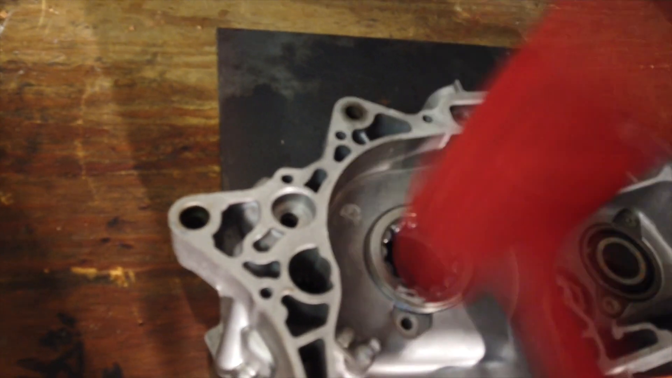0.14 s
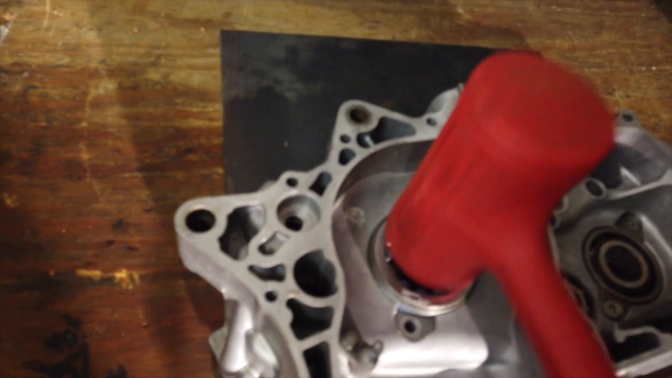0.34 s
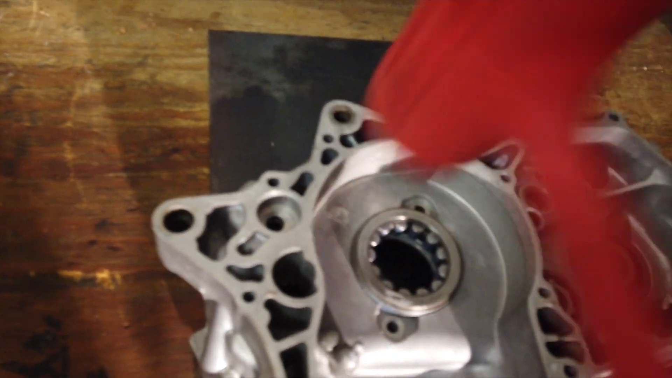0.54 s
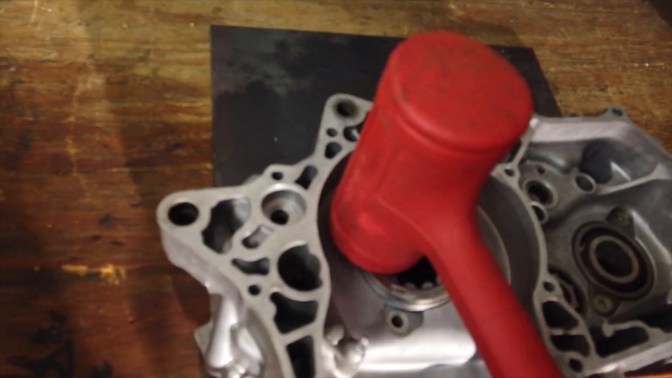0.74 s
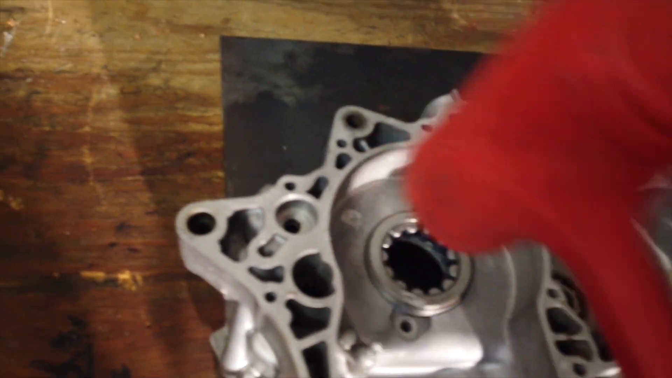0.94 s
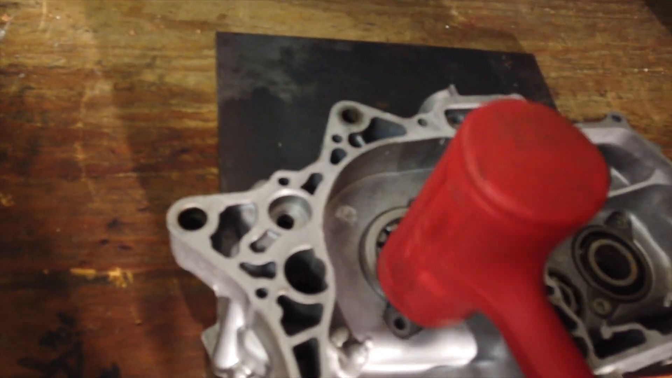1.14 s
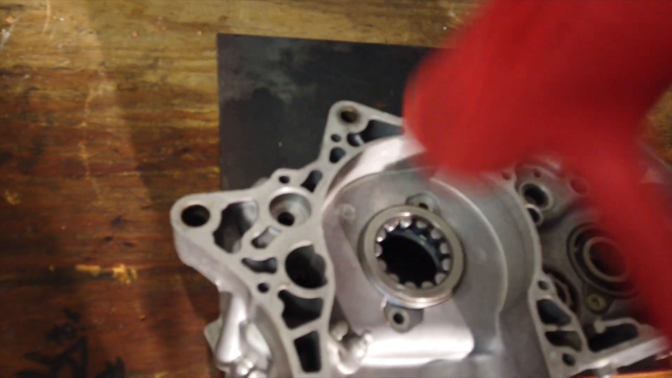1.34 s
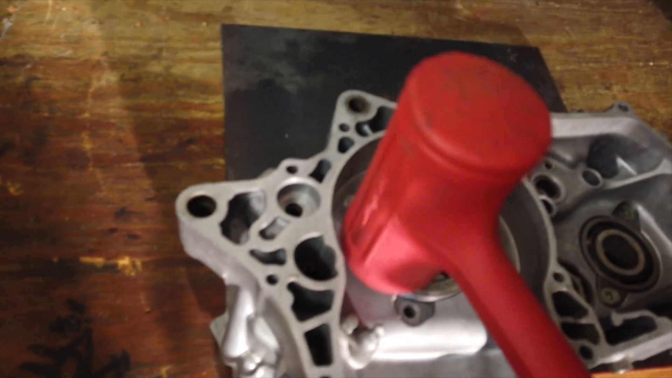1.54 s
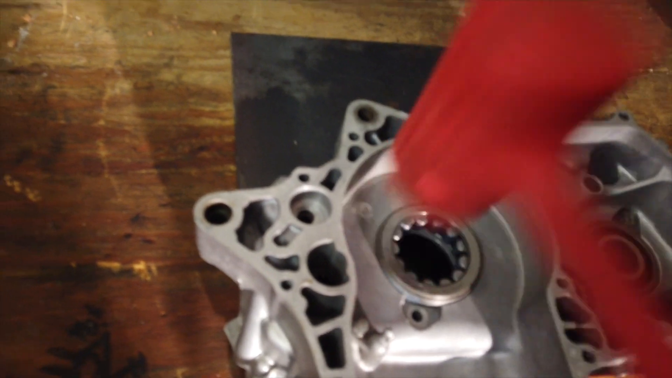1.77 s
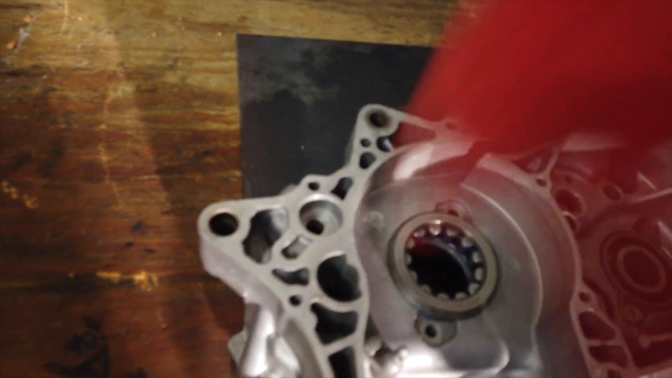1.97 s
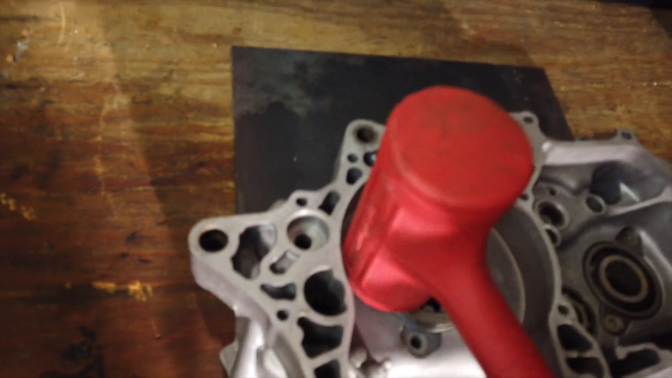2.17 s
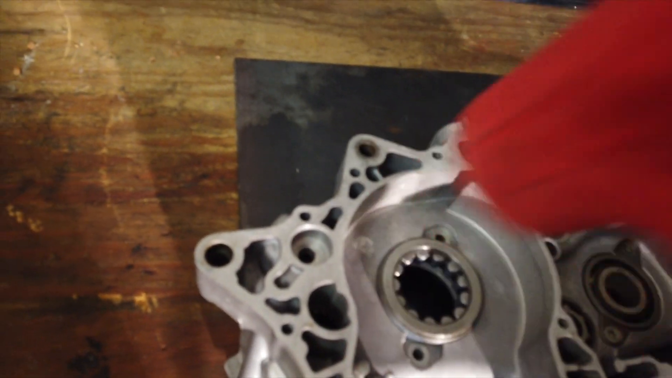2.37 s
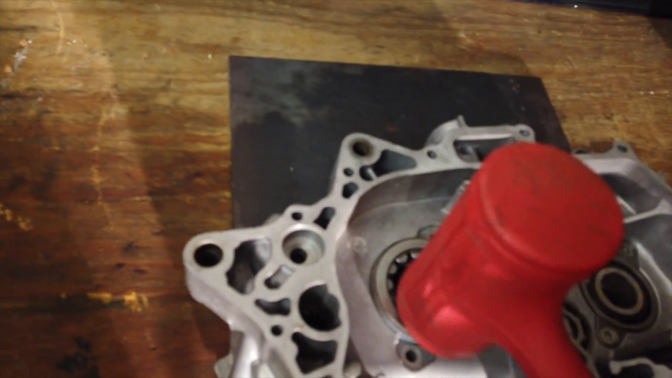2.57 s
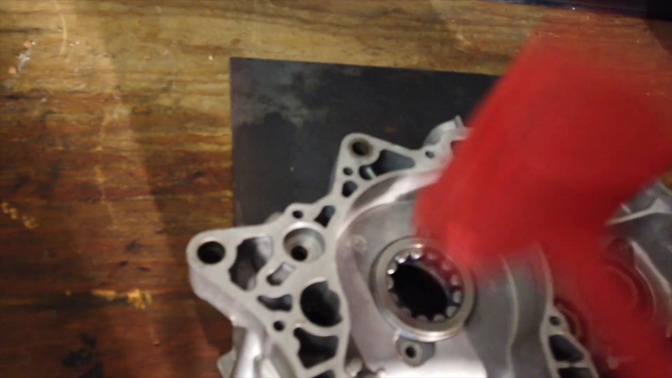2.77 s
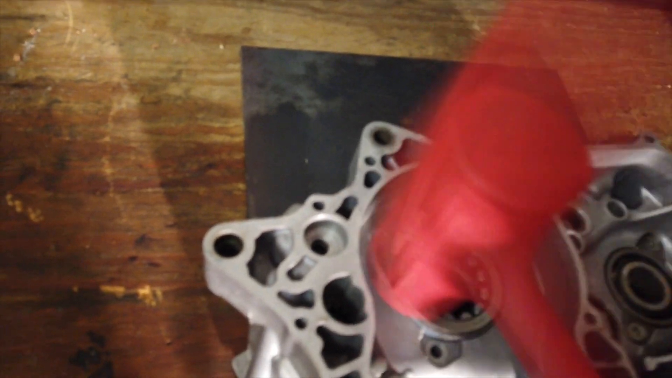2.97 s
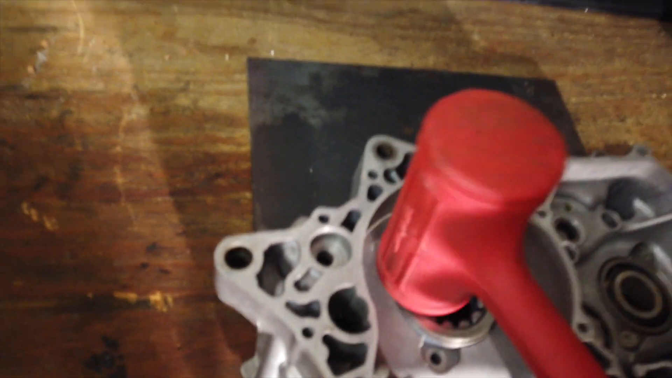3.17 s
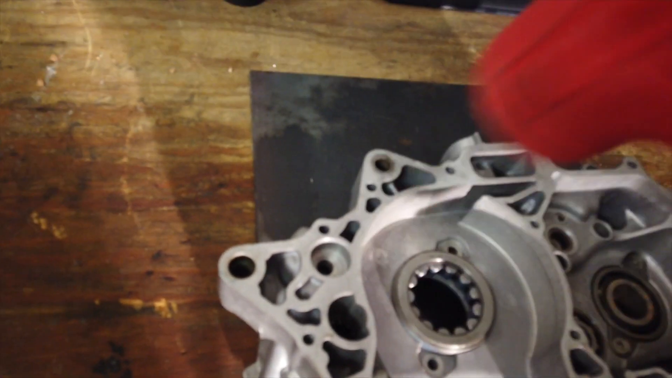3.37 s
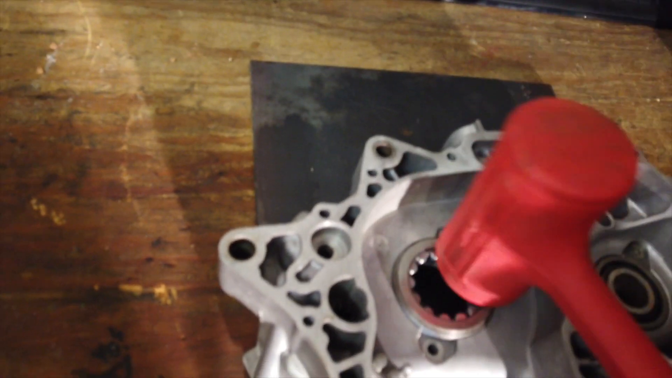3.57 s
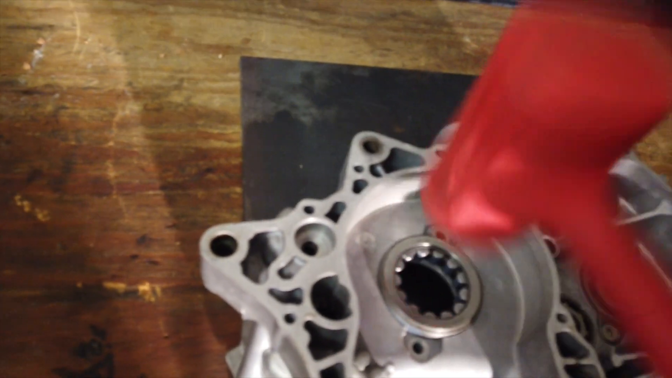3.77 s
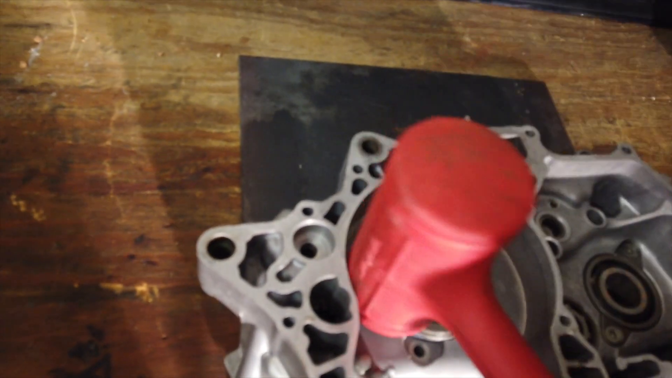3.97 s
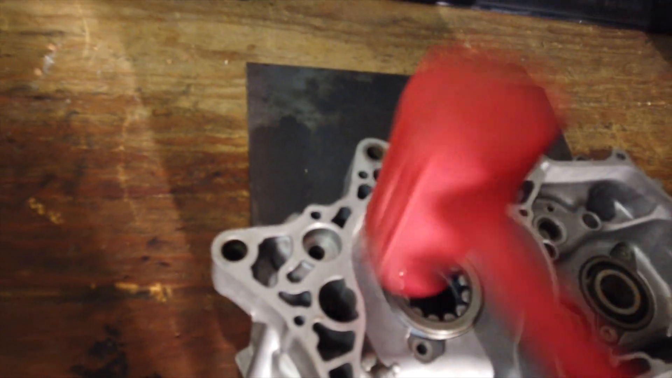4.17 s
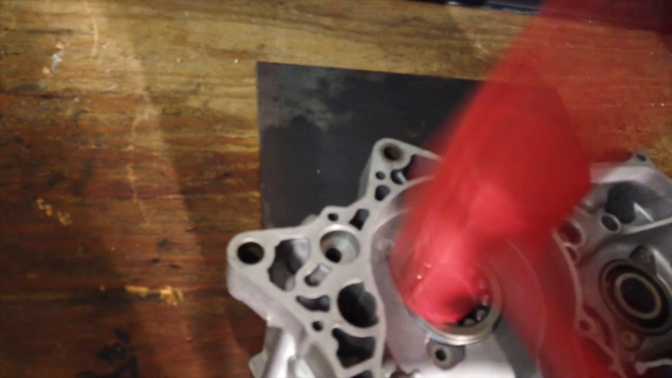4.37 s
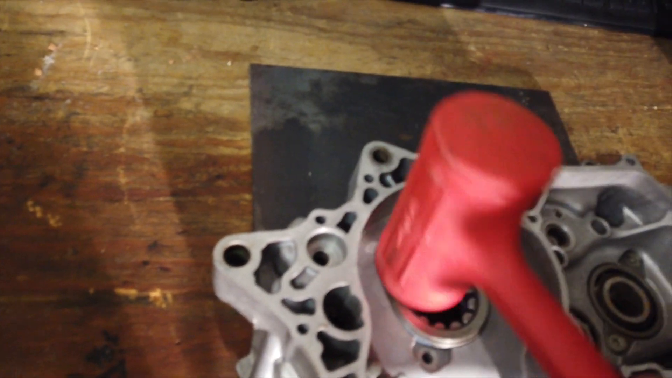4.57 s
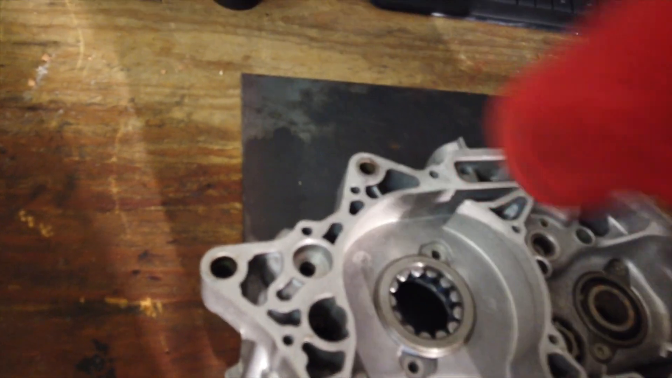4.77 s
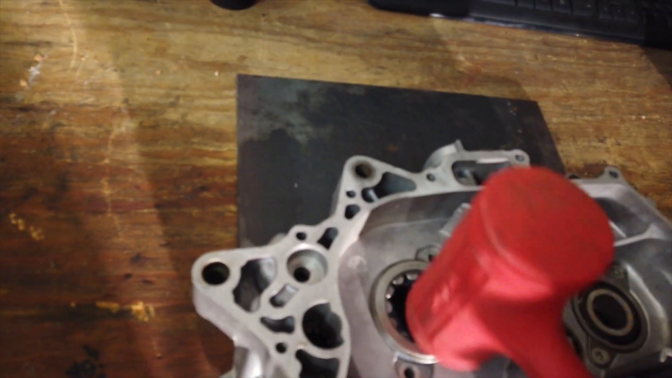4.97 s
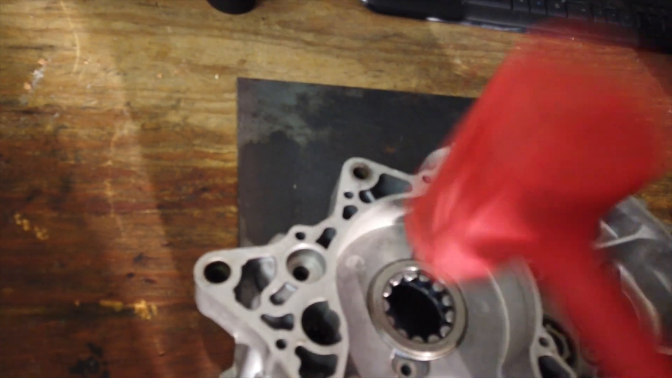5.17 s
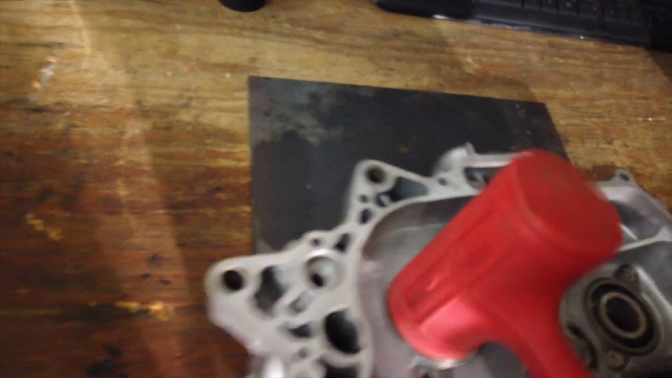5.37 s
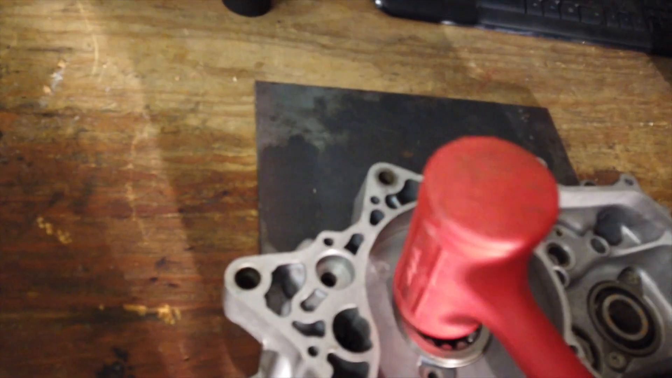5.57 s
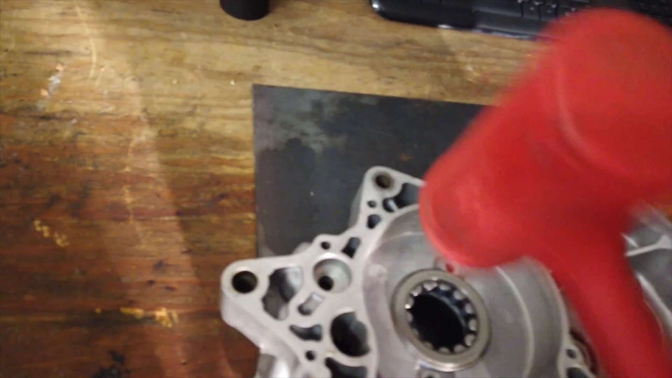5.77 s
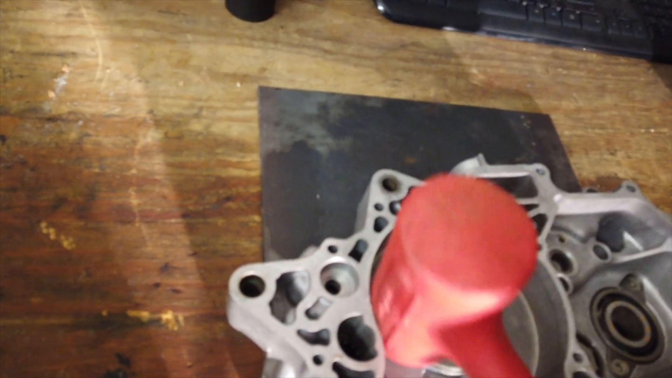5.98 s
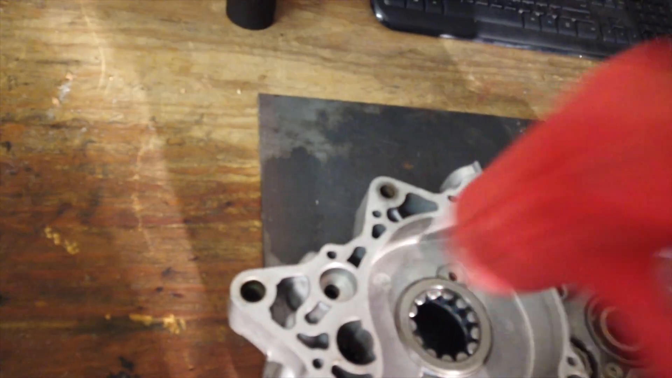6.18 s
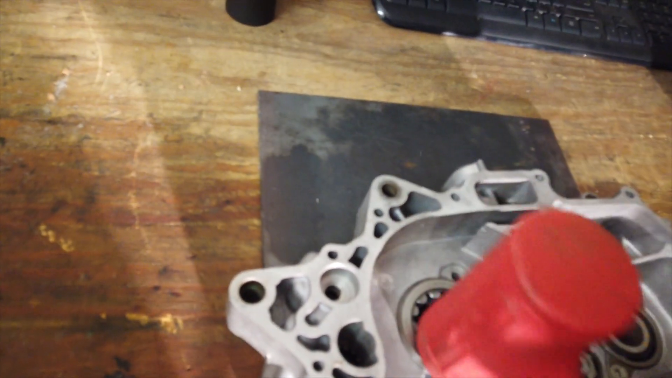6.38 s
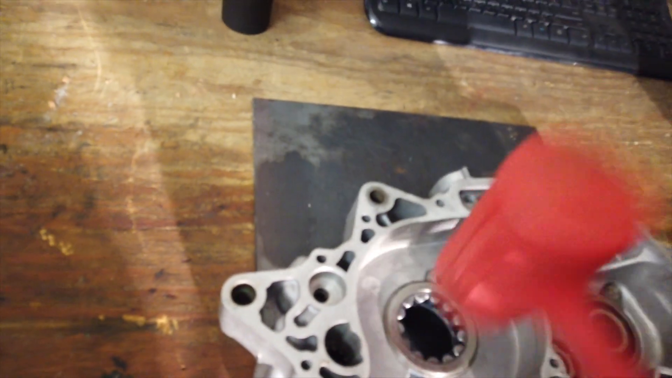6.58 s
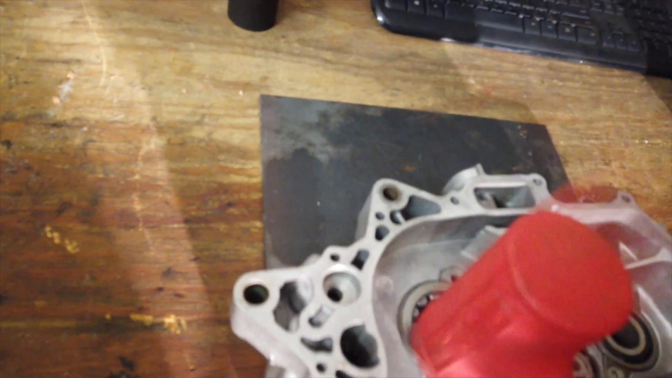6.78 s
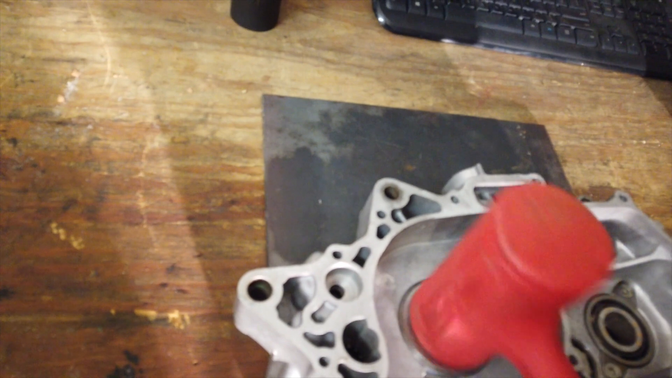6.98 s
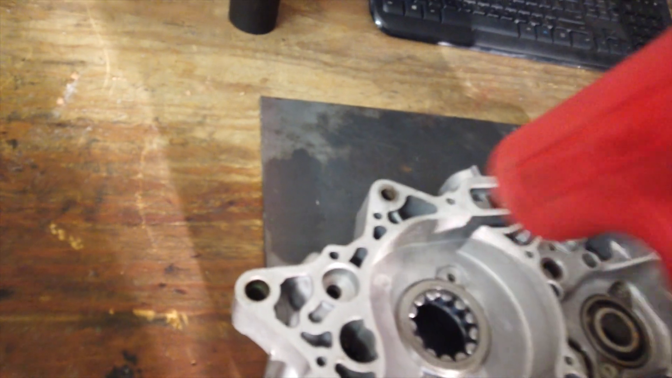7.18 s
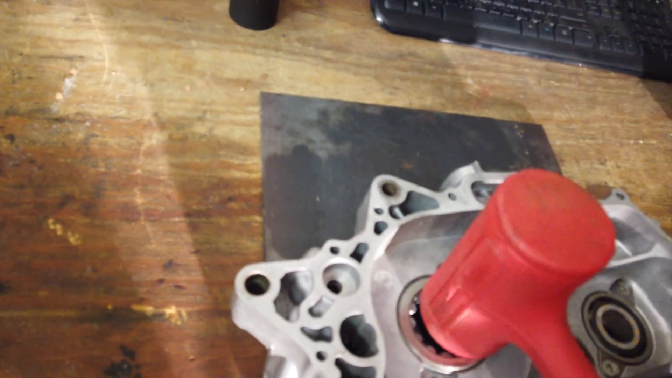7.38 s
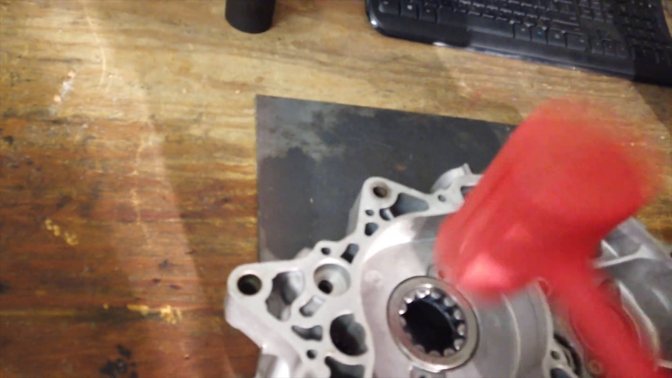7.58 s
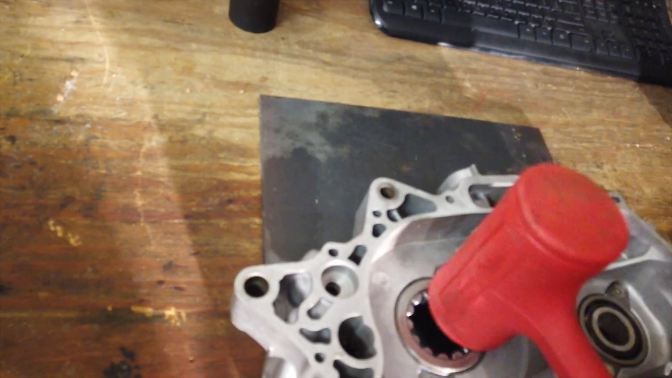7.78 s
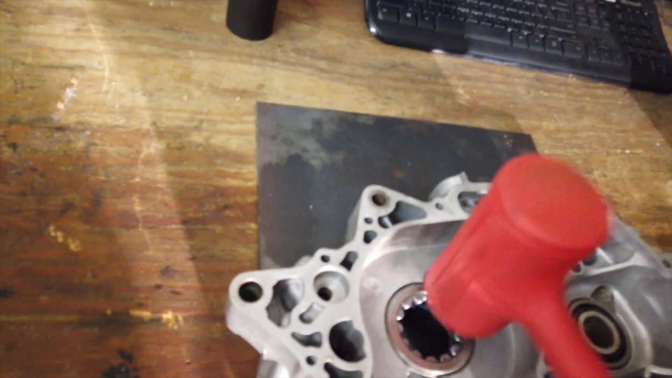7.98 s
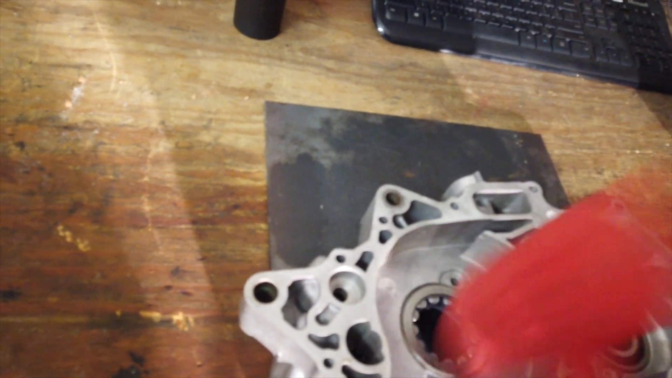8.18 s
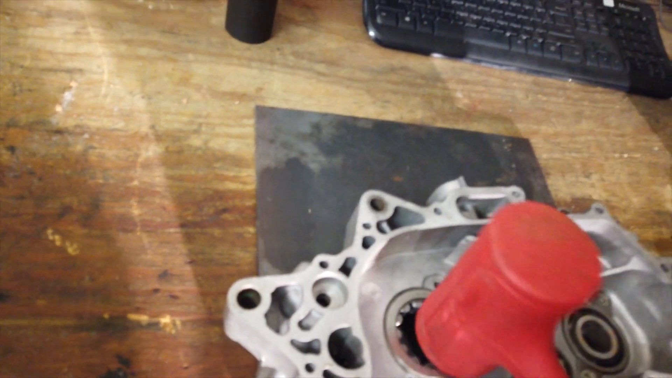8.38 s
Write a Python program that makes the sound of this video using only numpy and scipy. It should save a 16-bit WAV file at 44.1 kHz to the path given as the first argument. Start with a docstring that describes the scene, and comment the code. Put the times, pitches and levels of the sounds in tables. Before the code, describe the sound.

Close stereo sound in a workshop, slightly overloaded on peaks. It opens on the fading ring of a blow just before. From 0.3 seconds a shot-filled rubber mallet hits a cast engine case about every half second: near 0.7, 1.2, 1.6, 2.1, 2.6 and so on to a last hit at 8.3, cut short by the end. Each blow is a blunt crack, a grainy clatter against the steel plate and a clanging ring dying within about half a second, with a low bench thud. Strength varies; the hit at 3.1 is strongest, while those at 0.3, 1.2, 7.4 and 8.3 are softer, some of them thuddier. A tiny high hiss of sliding shot leads most blows. Clacks follow many as the case drops back, notably at 0.75, 1.2, 3.6 and 6.9. A thin high bearing note lingers, clearer around 4.5 and 5.5. Faint bassy air noise underneath.

```python
"""In a workshop, a shot-filled rubber mallet drives a bearing into a cast engine case.
The case lies on a steel plate on a wooden bench. Shaped noise makes each crack, clatter and room tail;
dying sine waves make the ringing case, bearing and plate and the thud of the bench.
Before each blow, loose shot hisses in the mallet head; after many, the case drops back with a clack.
Faint air noise lies under it all. Two close microphone ports overload on the peaks."""
import sys
import numpy as np
from scipy import signal
from scipy.fft import rfft, irfft
from scipy.io import wavfile
from scipy.ndimage import uniform_filter1d

SR = 44100
rng = np.random.default_rng(int(sys.argv[2]) if len(sys.argv) > 2 else 0)


def unload_audio(sound):
    """Save the sound as a 16-bit wav file, at the path given as the first command line argument."""
    columns = np.transpose(np.atleast_2d(sound))
    # keep every value between -1 and 1, then stretch to whole-number steps
    steps = np.round(np.clip(columns, -1, 1) * 32767)
    wavfile.write(sys.argv[1], SR, steps.astype(np.int16))


N = 371322
SPAN = 32768  # samples in one blow
BLOW_T = np.arange(SPAN) / SR  # time since the hit, s


def gain_of(db):
    """Turns decibels into an amplitude factor."""
    return 10 ** (np.asarray(db) / 20)


def read(points, hz):
    """Reads a table at any frequency, with straight lines on a log-frequency axis."""
    f, value = np.transpose(points)
    return np.interp(np.log(hz + 1), np.log(f + 1), value)


def steady(points):
    """Makes a noise spectrum that stays the same over time."""
    return lambda hz, t: read(points, hz) + 0 * t


def build_up(t, rise_s):
    """Lets a sound grow smoothly from silence instead of starting with a jump."""
    return 1 - np.exp(-t / rise_s)


def add(mix, s, sound):
    """Mixes a sound in at s seconds; mix starts one second early."""
    part = mix[:, round((s + 1) * SR):][:, :sound.shape[1]]
    part += sound[:, :part.shape[1]]


# How alike the left and right ports hear a sound: f/Hz, likeness (0 to 1)
LIKENESS = [(30, 0.86), (60, 0.98), (120, 1), (300, 1), (700, 0.99), (1400, 0.91), (3000, 0.59),
            (6000, 0.18), (14000, 0.17)]
LAG_S = 5.2e-5  # the left port hears the shared sound this much later


def ports(right, stray):
    """Spreads a sound over two ports: the left hears it late and mixed with unrelated sound."""
    hz = np.fft.rfftfreq(len(right), 1 / SR)
    same = np.clip(read(LIKENESS, hz), 0, 1)
    late = np.exp(-2j * np.pi * hz * LAG_S) * rfft(right)
    left = same * late + np.sqrt(1 - same ** 2) * rfft(stray)
    return np.array([irfft(left, len(right)), right])


def noise(size, db_at, patchy_db=0.):
    """Two-port noise shaped in dB by db_at(hz, s), then scaled to a strength near 1 at its start."""
    hz = np.fft.rfftfreq(512, 1 / SR)[:, None]
    t = np.arange(size // 128 + 5) * 128 / SR
    a, b = rng.standard_normal((len(t), len(hz), 2, 2)).T
    # patches of frequency and time that are randomly louder or softer
    patches = rng.standard_normal((len(t), len(hz))).T
    patches = uniform_filter1d(patches, size=3, axis=0)
    patches = uniform_filter1d(patches, size=24, axis=1)
    shape = gain_of(db_at(hz, t) + patchy_db * patches / patches.std())
    pair = signal.istft((a + 1j * b) * shape, nperseg=512, noverlap=384)[1][:, :size]
    start_level = np.sqrt(np.sum(gain_of(db_at(hz, 0 * t[:1])) ** 2))
    return ports(*pair) / start_level


def crowded(x, width_hz, depth_db):
    """The ribbed casting has too many modes to list: narrow random peaks over the whole spectrum."""
    lumps = rng.standard_normal(SPAN // 2 + 1)
    lumps = uniform_filter1d(lumps, size=max(1, round(width_hz * SPAN / SR)))
    gain = gain_of(depth_db * lumps / lumps.std())
    return irfft(rfft(x) * gain / np.sqrt(np.mean(gain ** 2)), SPAN)


def rings(modes, spread_db, drift, blur):
    """Dying sines: each blow lands elsewhere, so levels and tuning scatter; contact blurs the phases."""
    t = BLOW_T
    hz, db, t60 = np.transpose(modes)[:, :, None]
    louder, sharper, phase = rng.standard_normal((len(modes), 2, 3)).T[..., None]
    steps = np.cumsum(rng.standard_normal((len(t) // 128 + 2, len(modes))), axis=0).T
    step_t = np.arange(steps.shape[1]) * 128 / SR
    wander = blur * np.array([np.interp(t, step_t, row) for row in steps])
    level = gain_of(db + spread_db * louder - 60 * t / t60)
    angle = 2 * np.pi * hz * (1 + drift * sharper) * t + 2 * phase + wander
    return ports(*(level * np.sin(angle)).sum(1))


# Still workshop air, relative spectrum: f/Hz, level/dB (per Hz)
AIR = [(15, -10), (30, 3), (160, -12), (500, -18), (3400, -22), (6500, -28), (9000, -48), (16000, -75)]
AIR_DB = -60


def still_air():
    """Faint, slightly patchy background noise, strongest in the bass."""
    return gain_of(AIR_DB) * noise(N, steady(AIR), patchy_db=1.5)


# First contact, relative spectrum: f/Hz, level/dB (per Hz)
CRACK = [(100, -20), (500, 5), (1500, -2.5), (3000, -2), (6500, 0), (10000, -6), (14000, -6), (16000, -25)]


def crack(db):
    """The mallet's first contact: a noise burst that dies by 60 dB in 50 ms."""
    return noise(SPAN, steady(CRACK)) * gain_of(db - 60 * BLOW_T / .05) * build_up(BLOW_T, .0007)


# Case against plate, relative spectrum (also used for the bounces): f/Hz, level/dB (per Hz)
CLATTER = [(24, -31), (40, 8), (140, -1), (873, -7), (990, 0.5), (1370, -8), (1720, -3), (4340, -11.5),
           (6490, -7), (9690, -21), (11600, -10.5), (14500, -28), (16000, -30)]
ROCKING_S = 0.032  # the clatter holds this long before it dies


def clatter(t60):
    """The case rocks on the plate: grainy noise builds up, holds, then dies away."""
    after = np.maximum(BLOW_T - ROCKING_S, 0)
    contacts = uniform_filter1d(rng.standard_normal(SPAN), size=130)  # uneven, a few ms each
    grain = gain_of(4.2 * contacts / contacts.std())
    rattle = crowded(noise(SPAN, steady(CLATTER)), width_hz=90, depth_db=1.5)
    return rattle * build_up(BLOW_T, 0.014) * grain * gain_of(-8.5 - 60 * after / t60)


# Casting and room, relative spectrum: f/Hz, level/dB (per Hz)
TAIL = [(24, -51), (40, -26), (91, -16), (249, -7), (290, -4.5), (433, -8.5), (1020, -9.5), (1180, -12),
        (3220, -13.5), (3470, -11.5), (4240, -17.5), (6490, -12.5), (11600, -20), (14500, -26.5),
        (16000, -95)]
# Time the tail takes to fall by 60 dB: f/Hz, t60/s
TAIL_T60 = [(60, 1), (160, 0.51), (420, 0.64), (1100, 0.61), (2900, 0.72), (6000, 0.68), (9000, 0.47),
            (14000, 0.41)]


def tail():
    """Casting and workshop answer with dense noise that fades at its own pace in each pitch range."""
    wash = noise(SPAN, lambda hz, t: read(TAIL, hz) - 60 * t / read(TAIL_T60, hz), patchy_db=2.5)
    return crowded(wash, width_hz=30, depth_db=2.5) * gain_of(-6.5) * build_up(BLOW_T, 0.015)


# Ringing modes of the cast case: f/Hz
CASE_HZ = [400, 660, 797, 998, 1125, 1202, 1497, 1730, 1851, 2811, 3240, 5428, 5830, 6265, 6640, 7290, 8162,
           8694, 11205]
# The same modes in order, before the colour of the blow: level/dB, t60/s
CASE = [(-27, 0.45), (-19.5, 0.54), (-17, 0.21), (-14.5, 0.15), (-29, 0.8), (-26.5, 0.53), (-46, 0.26),
        (-29, 0.79), (-27.5, 0.78), (-17.5, 0.4), (-33, 0.14), (-53, 0.22), (-38, 0.28), (-15.5, 0.43),
        (-25.5, 0.87), (-19, 0.36), (-22, 0.24), (-22, 0.27), (-24, 0.57)]


def case_ring(colour):
    """The hit casting rings at its own modes, tinted by the colour of the blow."""
    modes = [(f, level + colour(f), t60) for f, (level, t60) in zip(CASE_HZ, CASE)]
    return rings(modes, spread_db=3, drift=0.002, blur=0.9) * build_up(BLOW_T, 0.0043)


BEARING_HZ, BEARING_T60 = 3475, 0.89  # Hz, s: the steel race rings on after the casting


def bearing_ring(db):
    """The steel race of the bearing sings one long note."""
    race = rings([(BEARING_HZ, db, BEARING_T60)], spread_db=0, drift=.002, blur=.3)
    return race * build_up(BLOW_T, .005)


# A close pair of plate modes, before the level of the blow: f/Hz, level/dB, t60/s
PLATE = [(294, -2, 1.72), (285, -4, 1.14)]


def plate_ring(db):
    """Two nearly equal notes of the steel plate beat on into the next blow."""
    return rings(PLATE, spread_db=1.5, drift=.003, blur=.07) * gain_of(db) * build_up(BLOW_T, .02)


# Low modes of bench and plate, before the thud level of the blow: f/Hz, level/dB, t60/s
BENCH = [(56, -25.5, 0.68), (79.6, -15.5, 0.39), (108.4, -14, 0.42), (182, -18, 0.44), (289.2, -22.5, 0.66)]


def bench_thud(db):
    """The bench and plate shake at a few low modes."""
    return rings(BENCH, spread_db=3.0, drift=0.01455, blur=0.13) * gain_of(db) * build_up(BLOW_T, 0.013)


# Where the low, clank, treble and top colours of a blow act: f/Hz
COLOUR_HZ = [400, 2000, 6000, 12000]
CLANK_DB = 1.02  # the same for every blow


def blow(s, db, thud_db, low_db, treble_db, top_db, ring_db, plate_db, clatter_t60, crack_db):
    """One hit sets off crack, clatter, tail and all the ringing parts together."""
    def colour(hz):
        return read(list(zip(COLOUR_HZ, [low_db, CLANK_DB, treble_db, top_db])), hz)
    tint = gain_of(colour(np.fft.rfftfreq(SPAN, 1 / SR)))
    noises = crack(crack_db) + clatter(clatter_t60) + tail()
    body = irfft(rfft(noises) * tint, SPAN)
    ringing = case_ring(colour) + bearing_ring(ring_db) + plate_ring(plate_db)
    fade_out = np.clip((SPAN / SR - BLOW_T) * 10, 0, 1)  # over the last 0.1 s
    return s, gain_of(db) * (body + ringing + bench_thud(thud_db)) * fade_out


# Loose shot, relative spectrum: f/Hz, level/dB (per Hz)
SHOT = [(4000, -57), (8000, -82), (10500, 19), (12000, 32), (14000, -7), (16000, -19)]
SHOT_LEAD_S = 0.088  # the shot starts to slide this long before the blow


def swing(s, db):
    """Tiny steel balls tumble on the downswing: a brief high hiss ahead of the blow."""
    hiss = noise(2600, steady(SHOT))
    return s - SHOT_LEAD_S, gain_of(db) * hiss * signal.windows.tukey(2600, .7)


BOUNCE_TILT_DB = -1.8  # about this much per octave: duller than the clatter


def bounce(s, db):
    """The case drops back on the plate: a short clack of metal on metal."""
    t = np.arange(4096) / SR

    def spectrum(hz, t):
        return read(CLATTER, hz) + BOUNCE_TILT_DB * np.log2(hz / 1000 + 0.15) + 0 * t
    return s, noise(len(t), spectrum) * gain_of(db - 60 * t / 0.025) * build_up(t, 0.0052)


# Mallet blows; the first lands just before the start, so one hears only what follows it:
# t/s, strength/dB, bench thud/dB, low colour/dB, treble colour/dB, top colour/dB,
# bearing ring/dB, plate ring/dB, clatter t60/s, crack/dB, shot hiss/dB (hiss ignores strength)
BLOWS = [(-.17, -6, 2.5, 5.5, -3, -7, -30, -25.5, 0.26, -4, -90),
         (0.291, -6.5, 5, 7, -3.5, -8, -28, -24, 0.092, 1.5, -64),
         (0.74, -0.5, -2.5, -2, -6, -10, -28.5, -43, 0.14, -3.5, -61),
         (1.163, -6, 4.5, 6, -5.5, -5.5, -34, -40, 0.18, 3, -58),
         (1.614, -0.5, -2, 1, -4, -9, -34, -28.5, 0.12, -4, -57),
         (2.147, 0, -7, 1.5, -2, -7.5, -37, -28.5, 0.057, -3.5, -60),
         (2.631, -4, -3, 6, -2.5, -8.5, -31, -27.5, 0.14, -1, -60),
         (3.118, 2.5, -8.5, -2, -3, -9, -25, -33.5, 0.035, -6, -61),
         (3.622, 0.5, -11, 0, -7, -9.5, -31, -30, 0.093, -2.5, -69),
         (4.082, -0.5, -2.5, 1, -2, -7.5, -28, -28, 0.14, -4, -56),
         (4.524, -1, -7, -0.5, -6, -8.5, -22, -37.5, 0.1, -4, -61),
         (5.021, -3.5, -1, 4, -3.5, -6, -33, -33, 0.1, -3, -65),
         (5.4591, -1.5, -0.5, 2.5, -2, -8.5, -23, -28, 0.35, -9, -53),
         (5.988, -2.5, -2.5, 2, -3, -10.5, -25, -55, 0.13, 1, -70),
         (6.446, -1.5, 0, 1, -4, -9.5, -39, -35.5, 0.1, -3.5, -61),
         (6.919, -4.5, 0, 7, -5, -10, -38, -34, .18, 3, -69),
         (7.421, -6, -6.5, 1.5, -3, -2, -34, -29, .12, 0.5, -59),
         (7.893, -1, -1.5, 0, -1.5, -7.5, -34, -57, 0.081, -7.5, -73),
         (8.343, -6.5, 6, 7.5, 0.5, -4, -28, -40, 0.19, -4, -82)]
# The case drops back on the plate: t/s, level/dB
BOUNCES = [(0.3, 5.5), (0.312, 7), (0.753, 11.5), (1.178, 8.5), (1.632, 1), (1.659, -2), (2.158, -4),
           (2.236, -3), (2.643, 7), (3.221, 1), (3.632, 6), (3.641, 8), (4.533, 1), (4.544, 4), (4.599, -5),
           (5.51, 4), (5.534, 2), (6.018, 3.5), (6.029, 7), (6.485, 4), (6.936, 8.5), (7.443, 1.5)]


def scene():
    """Blows, swings and bounces over the still air of the workshop."""
    mix = np.zeros((2, N + SR))
    for *hit, shot_db in BLOWS:
        add(mix, *blow(*hit))
        add(mix, *swing(hit[0], shot_db))
    for row in BOUNCES:
        add(mix, *bounce(*row))
    return mix[:, SR:] + still_air()


EDGE_HZ = 16100  # upper band limit


def record(dry):
    """The microphone drops the deepest bass, its input flattens peaks at full scale, the top is cut."""
    knee = 9.  # higher means a sharper corner at full scale
    thin = signal.sosfilt(signal.butter(2, 36, "high", fs=SR, output="sos"), dry)
    clipped = thin / (1 + abs(thin) ** knee) ** (1 / knee)
    band_limit = signal.firwin(511, EDGE_HZ, window=("kaiser", 9), fs=SR)
    return signal.oaconvolve(clipped, band_limit[None], "same")


dry = scene()
out = record(dry)
unload_audio(out)
```